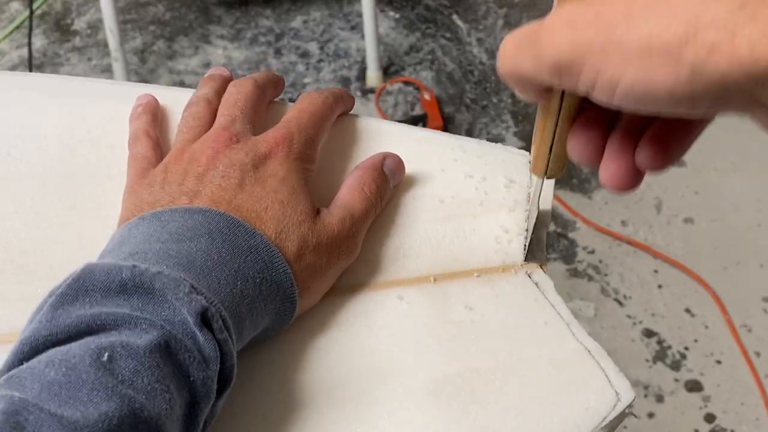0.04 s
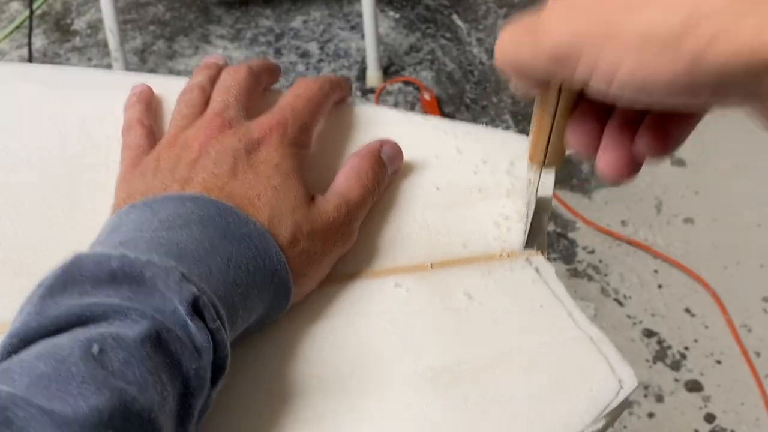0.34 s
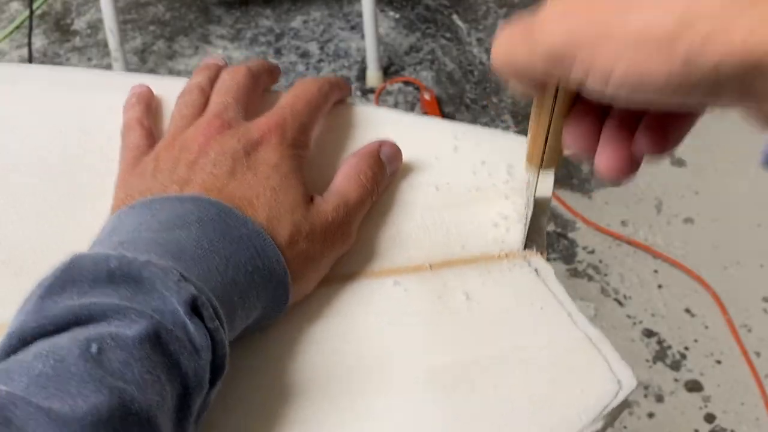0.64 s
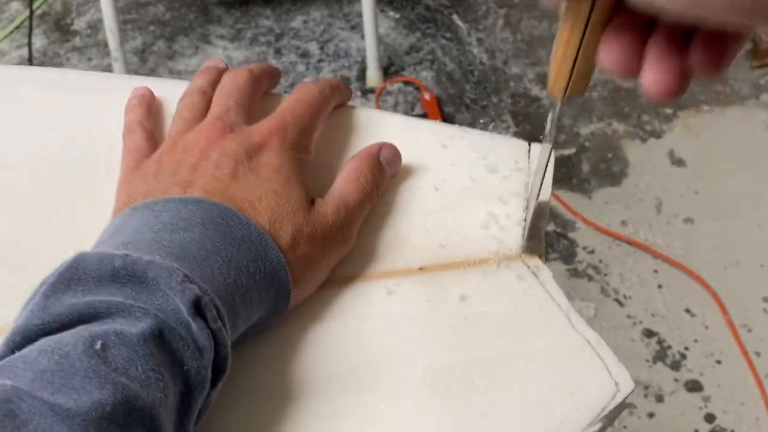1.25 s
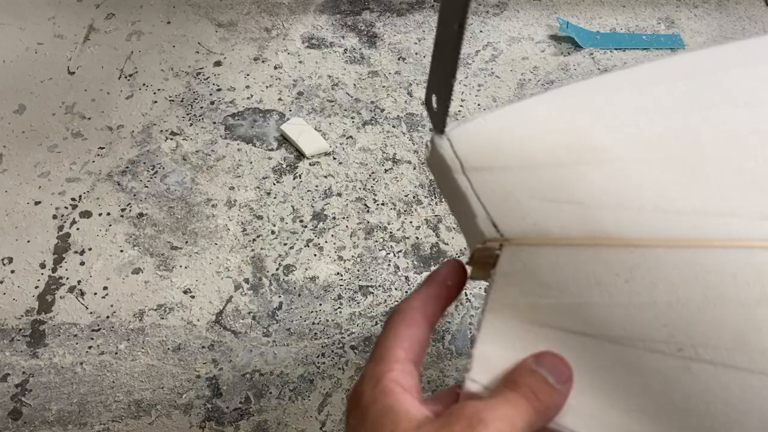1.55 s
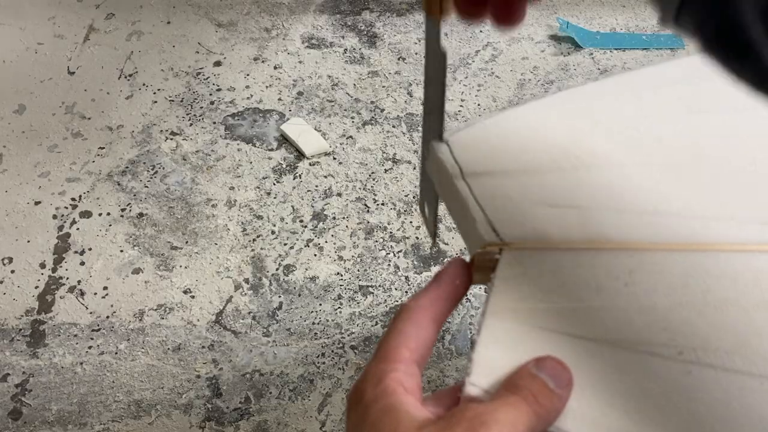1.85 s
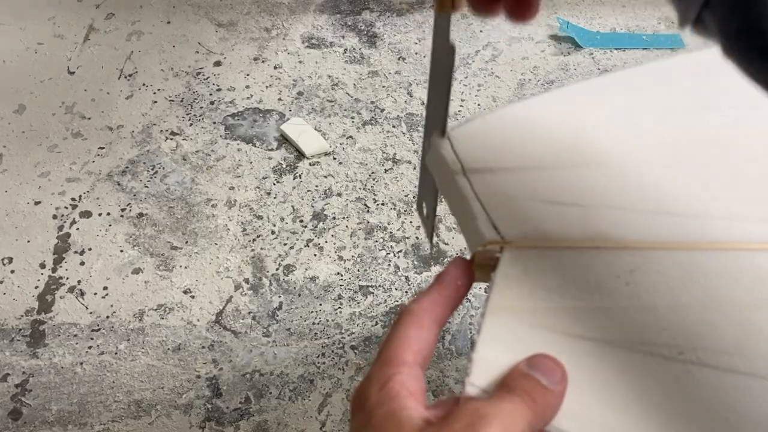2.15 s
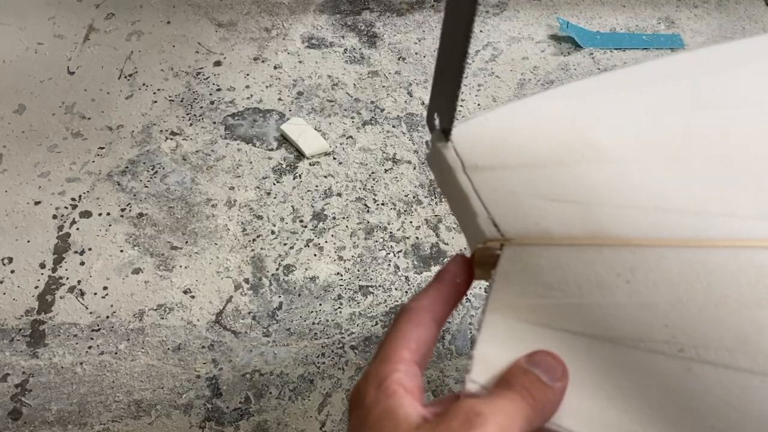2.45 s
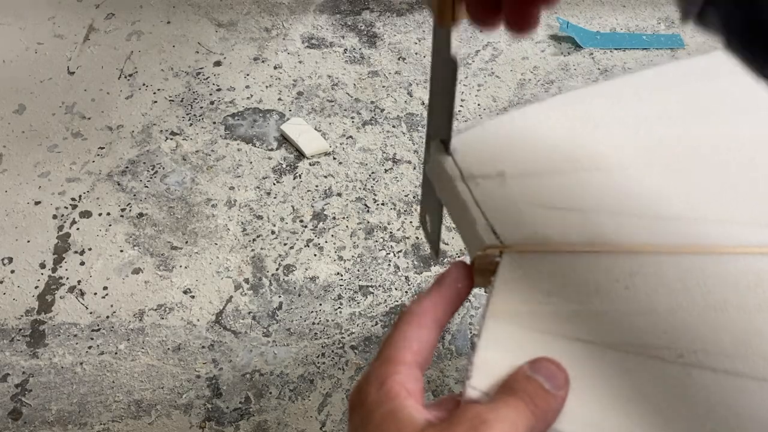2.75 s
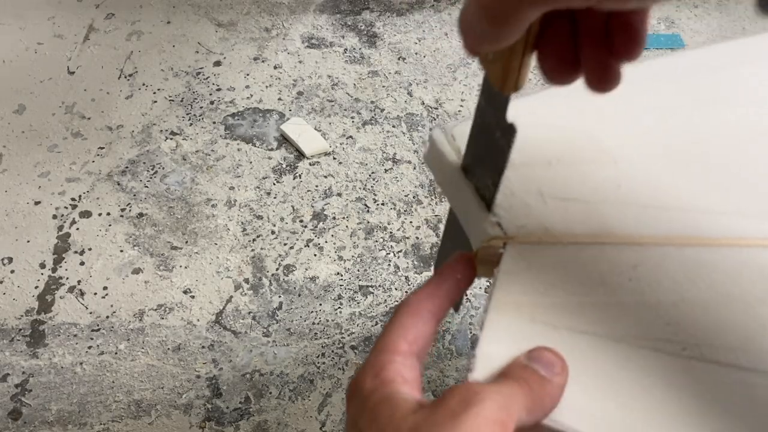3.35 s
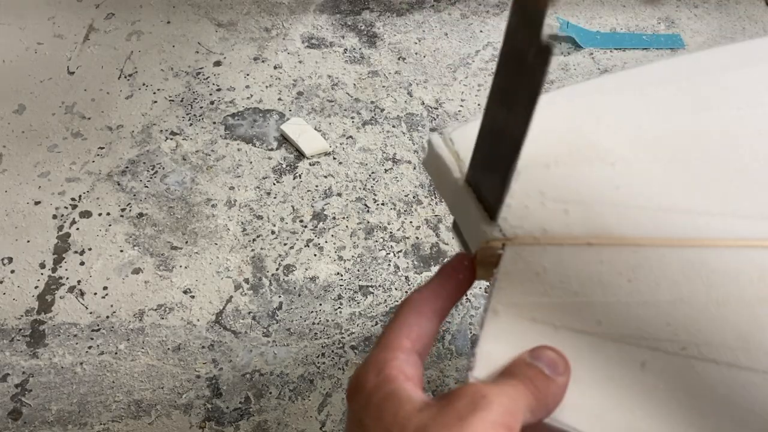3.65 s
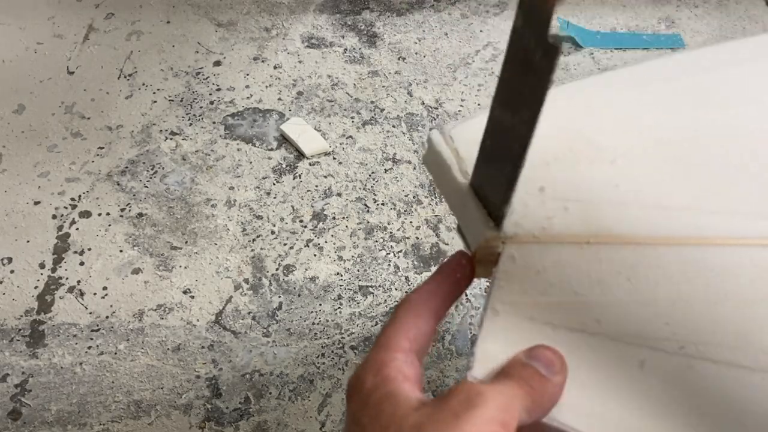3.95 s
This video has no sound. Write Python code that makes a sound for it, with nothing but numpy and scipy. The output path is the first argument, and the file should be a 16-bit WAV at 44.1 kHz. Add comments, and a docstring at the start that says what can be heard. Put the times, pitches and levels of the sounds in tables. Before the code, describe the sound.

A thin hand saw cuts a foam surfboard close to the microphone in a garage. Quick, hard strokes make the board ring hollow, with low buzzes and thumps. Slower, lighter strokes follow, with a fine hiss and faint blade ring.

```python
"""A thin hand saw trims the tail of a foam surfboard, close up in a garage. Its teeth tear tiny grains of
foam; the board colours them and the room answers. First comes the end of one bright stroke. Quick, hard
strokes cut in: the hollow-sounding board rings and the blade judders, at first over a low, sinking drone,
and air puffs once on the microphone. From 1.5 s, slow, light strokes mostly hiss. Brief scrapes and a thin
ring of the blade come and go, and quiet room tone lies under it all."""
import sys
import numpy as np
from scipy import signal
from scipy.fft import rfft, irfft
from scipy.io import wavfile
from scipy.ndimage import uniform_filter1d, map_coordinates

SR = 44100
rng = np.random.default_rng(int(sys.argv[2]) if len(sys.argv) > 2 else 0)


def master(y):
    """Save y as 16-bit WAV."""
    cut = np.clip(np.atleast_2d(y).T, -1, 1)
    pcm = np.round(cut * 32767)  # scale
    wavfile.write(sys.argv[1], SR, pcm.astype(np.int16))


N = 176400
FFT_SIZE = 196608
T, HZ = np.arange(N) / SR, np.fft.rfftfreq(FFT_SIZE, 1 / SR)

# Tone of the bright rasp, in the opening and slow strokes. Each row: frequency in Hz, level in dB.
BRIGHT_COLOUR = [(30, -17), (90, -3.5), (280, 0), (550, -.3), (1000, -7), (1400, -12), (3200, -19),
                 (5000, -19), (9000, -15.3), (15500, -15.3)]
# Its board and blade resonances. Each row: centre in Hz, width in Hz, lift in dB.
BRIGHT_MODES = [(245, 40, 4), (463.5, 30, 4), (593, 60, 3.4), (1700, 300, 3), (2390, 800, 6),
                (3850, 650, 8), (6000, 1200, 4), (7450, 1200, 6), (12500, 2200, 2.5)]
# Its stereo image. Each row: frequency in Hz, left-right likeness from 0 to 1, left minus right in dB.
BRIGHT_IMAGE = [(100, 1, -2.5), (370, 0.92, -2), (760, 0.31, -1.5), (1320, 0.052, 1), (2110, 0.95, 0),
                (6000, 1, -0.5), (15000, 1, 0.5)]


def sawing(strokes, colour, modes, tooth_hz, bite, grains_per_s, spread_db, flutter_db,
           hiss_law, board_law):
    """Teeth pass at blade speed and burst foam cells; the grains ring board and blade. Gives two spectra."""
    full_swing_s, turn_s = .3, .036  # longer strokes hold top speed; the hand eases through each turn
    speeds = [np.minimum(arch(start, length, skew) * max(length / full_swing_s, 1), 1)
              for start, length, _, _, skew, _, _ in strokes]
    teeth_passed = np.cumsum(tooth_hz * sum(speeds) * (1 + .142 * drift(56.5))) / SR
    grip = unit(np.exp(bite * np.cos(2 * np.pi * teeth_passed)) * amp(flutter_db * drift(49)))
    sizes = amp(spread_db * np.minimum(rng.exponential(1, N), 5))
    bursts = rng.random(N) < grains_per_s / SR
    grains, contact = unit(sizes * bursts * rng.standard_normal((2, 2, N))) * grip
    hiss = board = rings = 0
    for (_, length, hiss_db, board_db, _, ring_hz, ring_db), speed in zip(strokes, speeds):
        ease = int(SR * min(turn_s, length / 4)) + 1
        push = uniform_filter1d(speed ** board_law, ease)
        hiss += amp(hiss_db) * uniform_filter1d(speed ** hiss_law, ease)
        board += amp(board_db) * push
        contact_ring = unit(signal.lfilter(*signal.iirpeak(ring_hz, Q=6, fs=SR), contact))
        rings += amp(ring_db) * push * contact_ring
    lows, highs = board_and_blade(colour, modes)
    board_rasp = rfft(grains * board, FFT_SIZE) * lows
    blade_hiss = blade_glide(rfft(grains * hiss, FFT_SIZE) * highs)
    return board_rasp + blade_hiss + rfft(rings, FFT_SIZE)


def opening_stroke():
    """The dry, bright end of a stroke already under way."""
    # One row: start in seconds, length in seconds, hiss in dB, board in dB, skew (over 1 peaks late),
    # pitch of the ring at the point of contact in Hz, ring in dB.
    stroke = [(-.09, .24, -27, -29, 1, 2200, -37)]
    rasp = sawing(stroke, BRIGHT_COLOUR, BRIGHT_MODES, tooth_hz=400.6, bite=.033, grains_per_s=25000,
                  spread_db=2.5, flutter_db=2, hiss_law=1, board_law=.46)
    return stereo(rasp, BRIGHT_IMAGE, knee_hz=7930)


def quick_strokes():
    """Hard, short strokes with a coarser grain make the board ring hollow."""
    # Each row: start in seconds, length in seconds, hiss in dB, board in dB, skew, ring in Hz, ring in dB.
    strokes = [(.035, .1606, -28.5, -24.5, 1.1, 775, -32), (.196, .13, -26.5, -23, 1.04, 725, -33),
               (.333, .125, -27, -23.5, .98, 855, -27), (.466, .128, -30.5, -30.5, 1.0, 3900, -44),
               (.606, .13, -25, -24.5, .82, 1920, -48), (.75, .12, -29.5, -28, 1.05, 4100, -44),
               (.888, .124, -32, -23.5, .95, 885, -31), (1.036, .102, -31, -25, 1.0, 4150, -45.5),
               (1.15, .134, -28.5, -22.5, 1.1, 760, -25.5), (1.305, .115, -30.5, -30, 1.307, 2070, -42.5),
               (1.476, 0.051, -31.5, -23.5, .993, 905, -27)]
    # Tone of the hard rasp. Each row: frequency in Hz, level in dB.
    colour = [(30, -21), (100, 5.5), (250, -0.5), (600, -6), (1000, 1.5), (1500, -16.5), (3000, -18.5),
              (5000, -27), (9000, -29), (15500, -30.5)]
    # Board and blade resonances. Each row: centre in Hz, width in Hz, lift in dB.
    modes = [(253, 65, 8.5), (383.5, 46, 12), (495.7, 70, 14), (655, 25, 8.5), (758, 79, 8), (858, 29, 6),
             (1205, 240, 6.5), (1875, 230, 10.5), (2484, 390, 5.5), (3010, 180, 4.5), (4140, 540, 4.5),
             (6850, 800, 10)]
    # Stereo image. Each row: frequency in Hz, left-right likeness from 0 to 1, left minus right in dB.
    image = [(100, 0.53, 0.5), (258, 1, 3.5), (487, 0.86, 4), (900, 0.78, 0.5), (1550, 0.045, 8.5),
             (1740, 0.97, .5), (4930, 0.96, 0.5), (6940, 1, -0.5), (15000, 0.98, 0)]
    rasp = sawing(strokes, colour, modes, tooth_hz=414.8, bite=.17, grains_per_s=12000,
                  spread_db=2, flutter_db=.5, hiss_law=1.47, board_law=.7)
    return garage(stereo(rasp, image, knee_hz=7580), wet_db=-14.5)


def slow_strokes():
    """Long, light strokes shave the foam with a fine hiss."""
    # Each row: start in seconds, length in seconds, hiss in dB, board in dB, skew, ring in Hz, ring in dB.
    strokes = [(1.605, .39, -37.7, -35, 1.05, 820, -42.5), (2.02, .468, -37.7, -35, 1, 860, -41),
               (2.54, .33, -37.5, -34.3, 1, 600, -41.5), (2.922, .34, -35.3, -34.3, .9, 1600, -47),
               (3.325, .272, -32.8, -34.5, .97, 1330, -43), (3.59, .222, -37, -38.5, 1.05, 400, -38.5),
               (3.806, .205, -35.3, -36.3, 1.03, 2450, -43.5)]
    rasp = sawing(strokes, BRIGHT_COLOUR, BRIGHT_MODES, tooth_hz=314, bite=.2, grains_per_s=20000,
                  spread_db=1.85, flutter_db=.5, hiss_law=1.4, board_law=1)
    return garage(stereo(rasp, BRIGHT_IMAGE, knee_hz=7260), wet_db=-23.5)


def board_and_blade(colour, modes, crossover_hz=1330, ripple_db=4, spacing_hz=44.79):
    """Broad resonances and a crowd of small board modes, split into a low and a high filter."""
    small_modes_hz = np.arange(0, SR / 2, spacing_hz)
    ripple = ripple_db * np.interp(HZ, small_modes_hz, rng.standard_normal(SR)[:len(small_modes_hz)])
    ripple *= np.minimum(HZ / crossover_hz, 1)
    peaks = sum(db / (1 + (2 * (HZ - hz) / width) ** 2) for hz, width, db in modes)
    body = amp(curve(colour, HZ) + ripple + peaks)
    low_share = 1 / (1 + (HZ / crossover_hz) ** 8)
    return causal(body * np.sqrt(low_share)), causal(body * np.sqrt(1 - low_share))


def blade_glide(spectra, depth_s=.0016, rate_hz=4):
    """A wandering delay bends the blade's resonances up and down, as when its free length changes."""
    position = np.arange(N) + depth_s * SR * drift(rate_hz)
    return rfft([map_coordinates(x, [position], order=5) for x in irfft(spectra)], FFT_SIZE)


def buzzes_and_thumps():
    """Short, gliding low buzzes and thumps, and one deep puff of air on the microphone."""
    # Each row: start in seconds, length in seconds, first and last pitch in Hz, level in dB, octave
    # against the fundamental in dB, left minus right in dB, left lead in radians. The puff is at 0.54 s.
    bursts = [(-.025, 0.054, 79.5, 71, -12, -19, 1.5, 1), (0.113, 0.024, 232, 220, -15.5, -5, -3.5, -1.5),
              (0.267, 0.063, 250, 220.7, -16.5, -10.5, -4, 0.8),
              (0.481, 0.045, 135, 97.6, -12, -18, -5, 0.54),
              (0.517, 0.036, 66.1, 44.5, -13, -5.5, -10, -1.3), (0.54, 0.039, 44.2, 30, -17, -16, 3, 3.1),
              (0.585, 0.082, 130.9, 96, -26.5, -13, -16, -5), (0.66, 0.064, 280, 257, -29, -24, -4, -0.5),
              (0.718, 0.075, 143.4, 92, -22.5, -22, -11, 1.5), (0.937, .056, 170.2, 181, -26.5, -14, 3, 0),
              (1.189, 0.05, 165, 209, -27, -23, 6, 0), (1.208, 0.059, 262.6, 251, -20, -4.5, 1.5, 0),
              (1.389, 0.02, 261, 226, -33, 6, 1.5, 0)]
    lows = 0
    for start, length, first_hz, last_hz, db, octave_db, side_db, lead in bursts:
        pitch = np.interp(T, [start, start + length], [first_hz, last_hz])
        lows += pan(side_db) * amp(db) * arch(start, length) * buzz(pitch, octave_db, lead)
    return lows


def drone():
    """A low tone sinks while the first strokes bite."""
    # Each row: time in seconds, pitch in Hz, level in dB, octave against the fundamental in dB.
    sag = [(0.029, 115.8, -25.5, -4), (.11, 114, -28.5, -1.5), (.17, 112.4, -25.5, 5),
           (.22, 107.9, -23.5, -6), (.3, 100.1, -28, -7), (.38, 93.5, -29.5, 1), (0.451, 82.8, -34.5, -2),
           (0.488, 74, -20.5, 4.5)]
    times, hz, db, octave_db = np.transpose(sag)
    fade = np.clip(np.minimum(T - times[0], times[-1] - T) / .0055, 0, 1)
    tone = buzz(np.interp(T, times, hz), np.interp(T, times, octave_db), lead_rad=-2.2)
    return pan(db=-11) * amp(np.interp(T, times, db)) * fade * tone


def buzz(hz, octave_db, lead_rad, wobble=.019, overtone_step_db=-9):
    """A wobbling tone: the fundamental, shifted in phase on the left, and three ever weaker overtones."""
    phase = 2 * np.pi * np.cumsum(hz * (1 + wobble * drift(91))) / SR
    overtones = sum(amp(octave_db + overtone_step_db * k) * np.sin((k + 2) * phase) for k in range(3))
    return np.sqrt(2) * (np.sin(phase + np.array([[lead_rad], [0]])) + overtones)


def scrapes_and_blade_ring(sharpness=4.2):
    """Narrow bands of hiss: brief scrapes, and the blade ringing near 3.9 kHz during some strokes."""
    # Each row: start in seconds, length in seconds, pitch in Hz, level in dB.
    hisses = [(0.264, 0.0053, 4620, -30), (0.29, .06, 3840, -48), (0.351, 0.07, 1880, -33),
              (1.52, 0.0093, 7060, -45.5), (1.531, 0.021, 6400, -50), (1.602, .32, 3940, -47.5),
              (1.977, .087, 6350, -57), (2.957, 0.19, 4340, -45), (3.657, 0.11, 6040, -48),
              (3.87, 0.083, 3870, -51)]
    return sum(amp(db) * arch(start, length) * noise(1 / (1 + (sharpness * (HZ / hz - 1)) ** 2) ** 2)
               for start, length, hz, db in hisses)


def garage(x, wet_db):
    """The room adds sparse reflections, each band dying at its own speed."""
    # Each row: frequency in Hz, seconds to die away by 60 dB.
    decay = [(60, 0.074), (260, 1), (500, 0.82), (2000, 0.65), (12000, 0.14)]
    n = SR // 2
    reflections = rng.standard_normal((2, n)) * (rng.random((2, n)) < .1) * (T[:n] > .004)
    hz, t, bands = signal.stft(reflections, SR, nperseg=256)
    tail = signal.istft(bands * amp(-60 * t / curve(decay, hz)[:, None]), SR, nperseg=256)[1]
    return x + amp(wet_db) * signal.fftconvolve(x, tail / np.linalg.norm(tail[0]), axes=1)[:, :N]


def room_tone(level_db=-49.5):
    """Quiet, dark air, mostly shared by both sides."""
    # Each row: frequency in Hz, level in dB.
    colour = [(25, -17), (80, 5.5), (200, -8.5), (550, -3.5), (1200, -13), (3000, -21.5), (15500, -31.5)]
    gain = amp(curve(colour, HZ))
    return amp(level_db) * unit(noise(gain) + .5 * np.array([noise(gain), noise(gain)]))


def stereo(spectra, image, knee_hz, lag_s=.00023):
    """Blends two spectra into left and right sound; above the knee the left lags a little."""
    likeness = np.clip(curve(image, HZ), 0, 1)
    left = spectra[0] * np.exp(-2j * np.pi * lag_s * np.maximum(HZ - knee_hz, 0))
    right = likeness * spectra[0] + np.sqrt(1 - likeness ** 2) * spectra[1]
    return irfft(np.array([left, right]) * pan(curve(image, HZ, column=2)))[:, :N]


def arch(start, length, skew=1):
    """A swell from rest to full and back to rest."""
    return np.maximum(np.sin(np.pi * np.clip((T - start) / length, 0, 1) ** skew), 0)


def causal(gain):
    """A filter of unit energy that rings only after it is struck."""
    log_gain = np.log(np.maximum(unit(gain), 1e-5))
    mirrored = np.r_[log_gain, log_gain[-2:0:-1]]
    return np.exp(np.conj(signal.hilbert(mirrored)))[:len(HZ)]


def noise(gain):
    """Steady noise of rms 1, shaped by a gain at each frequency."""
    return unit(irfft(rfft(rng.standard_normal(FFT_SIZE)) * gain)[:N])


def drift(hz):
    """A random wander of rms 1, mostly slower than the given rate."""
    return noise(np.exp(-(HZ / hz) ** 2))


def curve(points, hz, column=1):
    """One column of a table, interpolated along log frequency."""
    table = np.transpose(points)
    return np.interp(np.log(hz + 1), np.log(table[0] + 1), table[column])


def pan(db):
    """Left and right gains for a level difference."""
    g = amp(np.atleast_1d(db) / 2)
    return np.array([g, 1 / g]) / np.sqrt((g ** 2 + g ** -2) / 2)


def amp(db):
    """Decibels to gain."""
    return 10 ** (np.asarray(db) / 20)


def unit(x):
    """Scales to rms 1."""
    return x / np.sqrt(np.mean(abs(x) ** 2) + 1e-20)


def scene(quick_from_s=.048, slow_from_s=1.5):
    """Three passages of sawing, joined by 2.5 ms crossfades, over the room tone."""
    opening = uniform_filter1d((T < quick_from_s) * 1., SR // 400)
    slow = uniform_filter1d((T >= slow_from_s) * 1., SR // 400)
    saw = opening * opening_stroke() + (1 - opening - slow) * quick_strokes() + slow * slow_strokes()
    low_end = (1 - slow) * (garage(buzzes_and_thumps(), wet_db=-9) + drone())
    return saw + low_end + scrapes_and_blade_ring() + room_tone()


def record(dry):
    """A steep low-pass takes off the very top, above 15.9 kHz."""
    return signal.oaconvolve(dry, signal.firwin(511, 15900, window=("kaiser", 9), fs=SR)[None], "same")


dry = scene()
out = record(dry)
master(out)
```